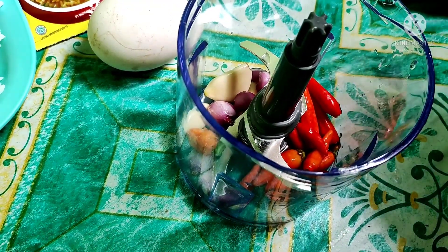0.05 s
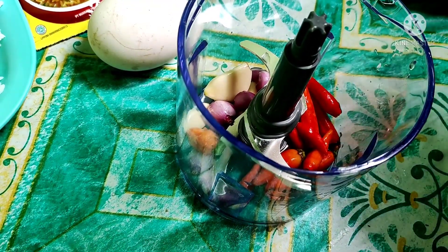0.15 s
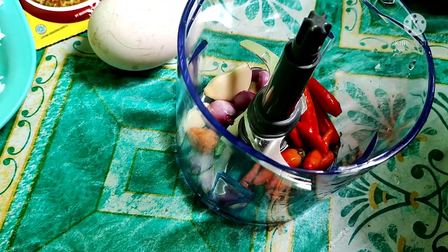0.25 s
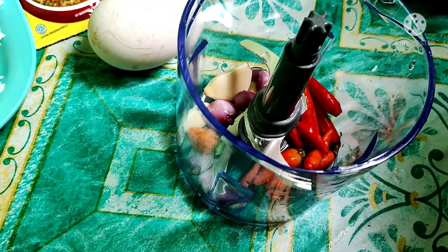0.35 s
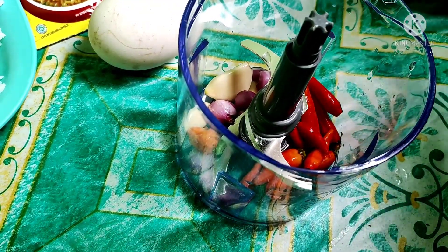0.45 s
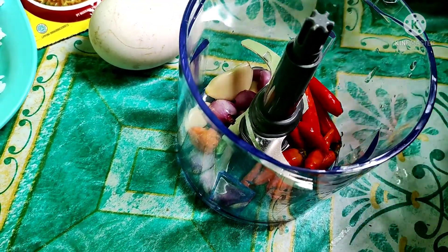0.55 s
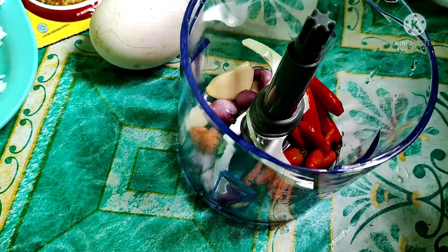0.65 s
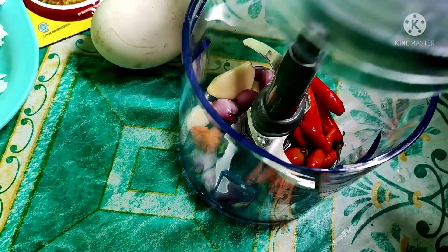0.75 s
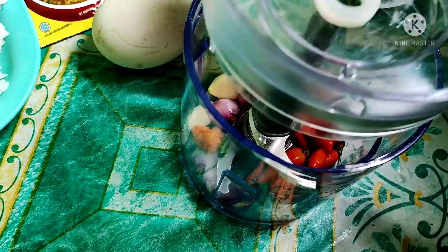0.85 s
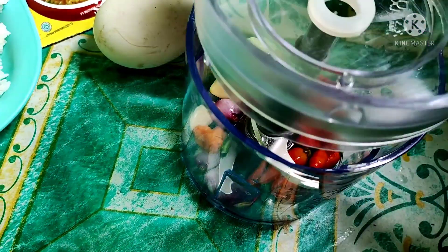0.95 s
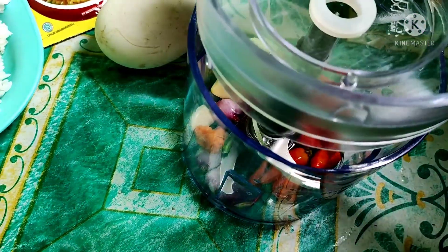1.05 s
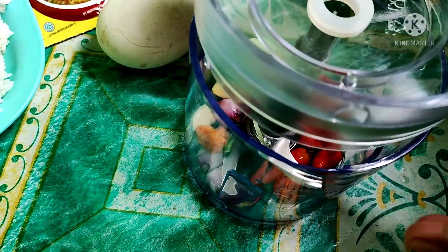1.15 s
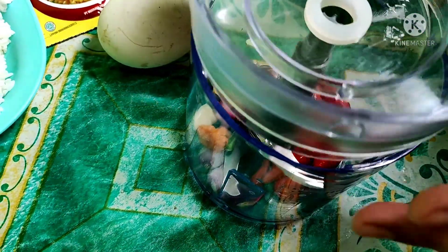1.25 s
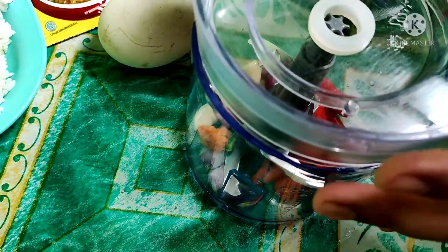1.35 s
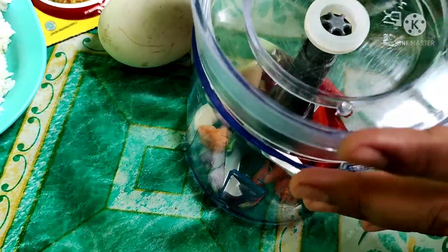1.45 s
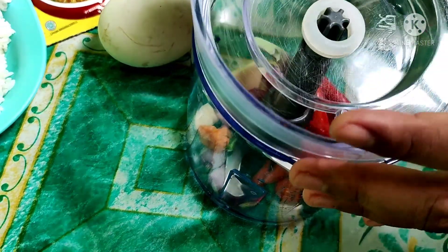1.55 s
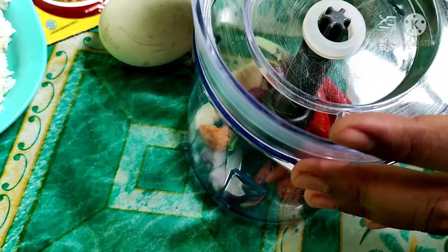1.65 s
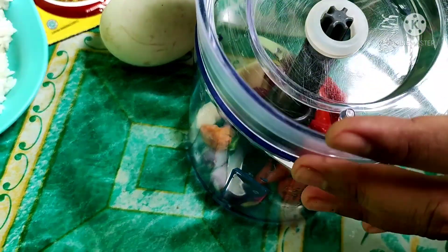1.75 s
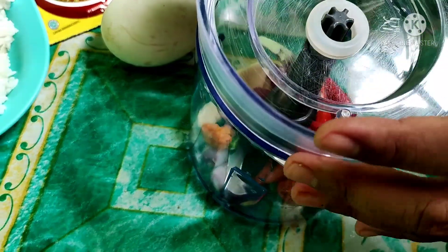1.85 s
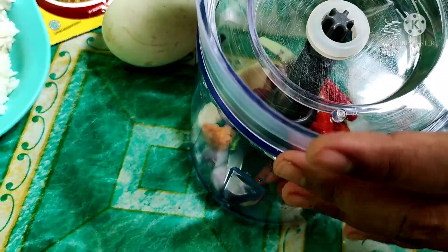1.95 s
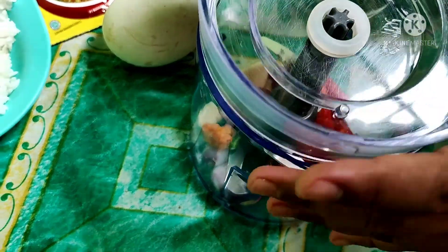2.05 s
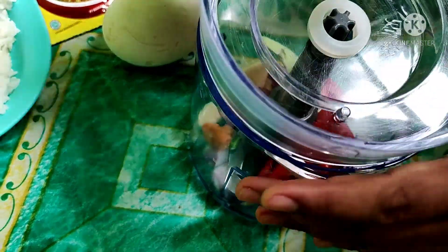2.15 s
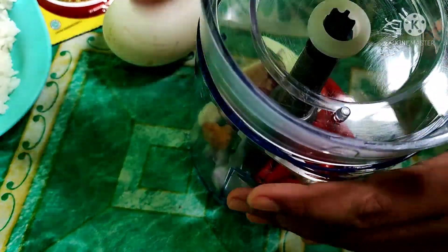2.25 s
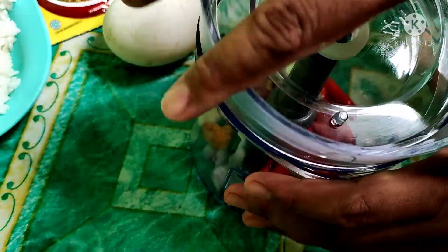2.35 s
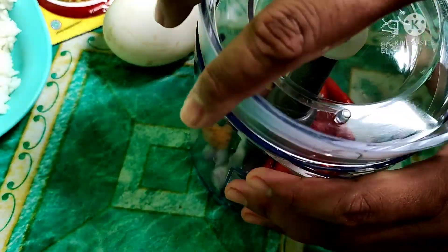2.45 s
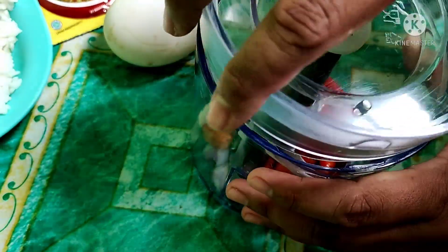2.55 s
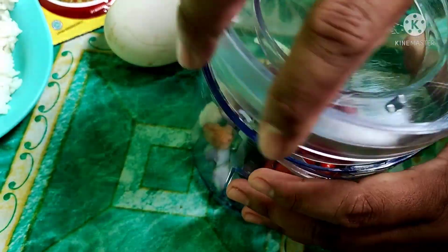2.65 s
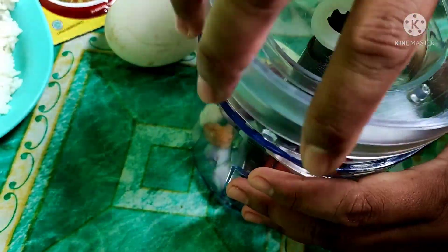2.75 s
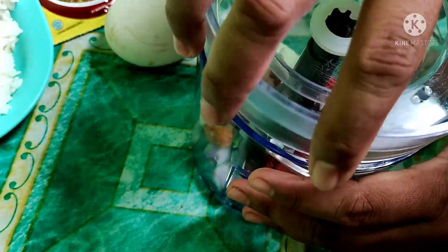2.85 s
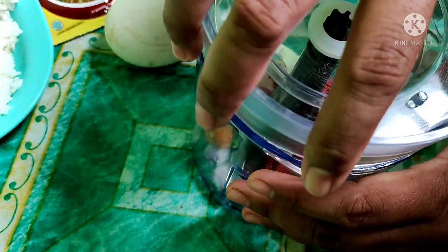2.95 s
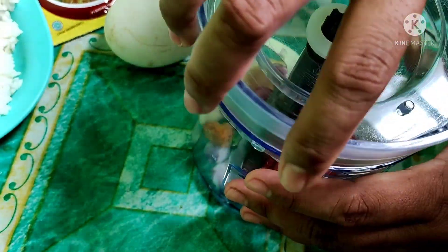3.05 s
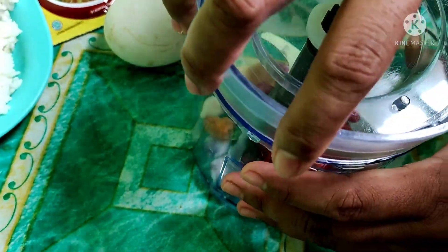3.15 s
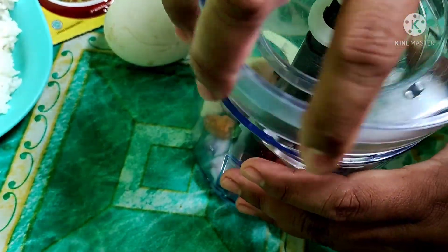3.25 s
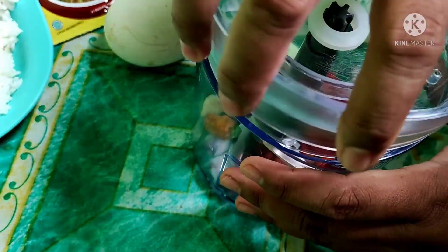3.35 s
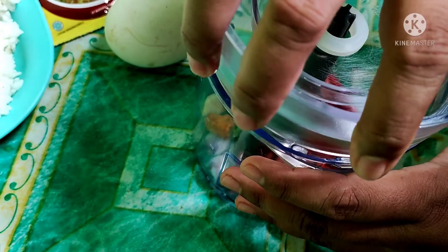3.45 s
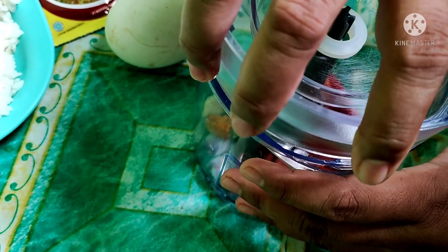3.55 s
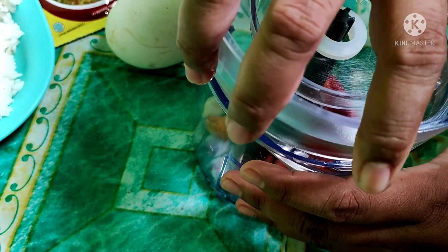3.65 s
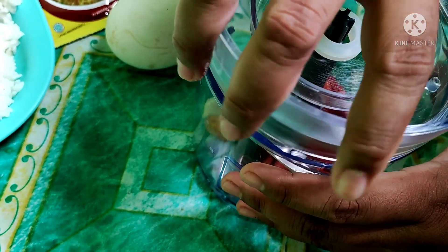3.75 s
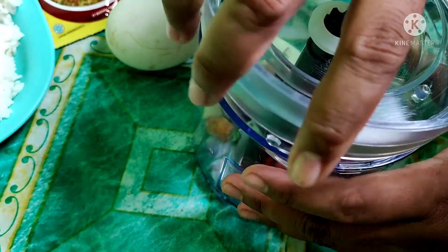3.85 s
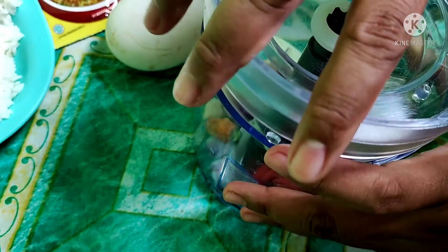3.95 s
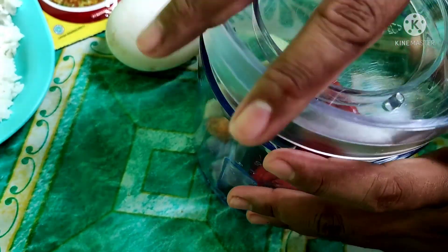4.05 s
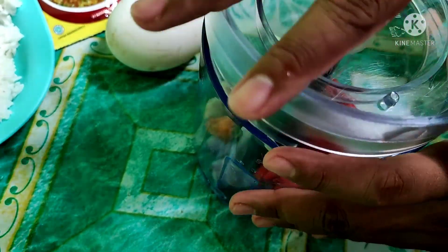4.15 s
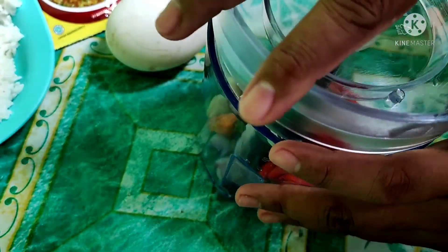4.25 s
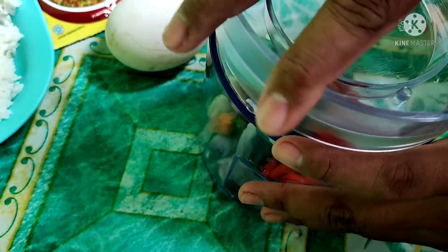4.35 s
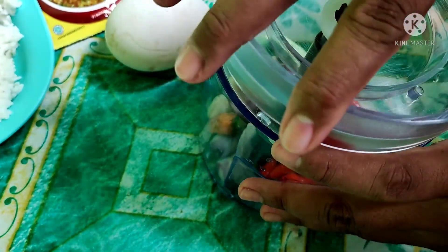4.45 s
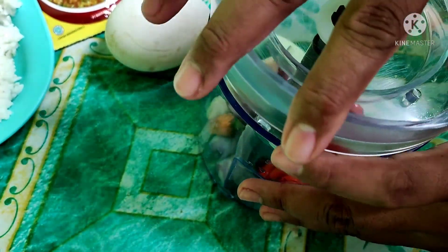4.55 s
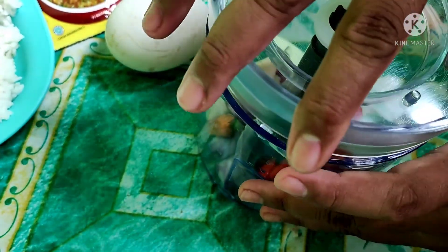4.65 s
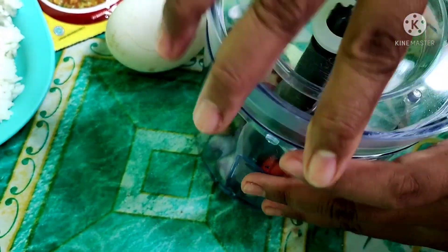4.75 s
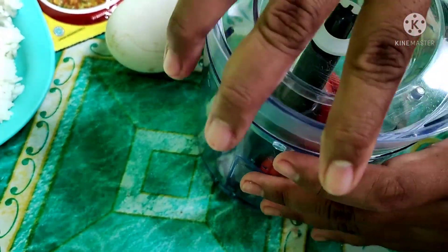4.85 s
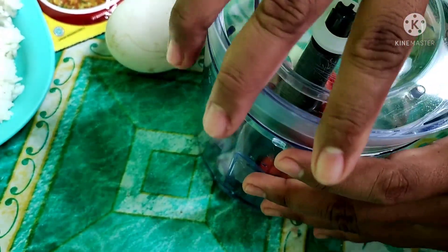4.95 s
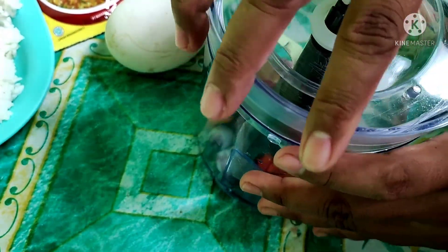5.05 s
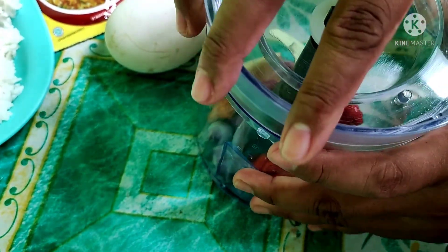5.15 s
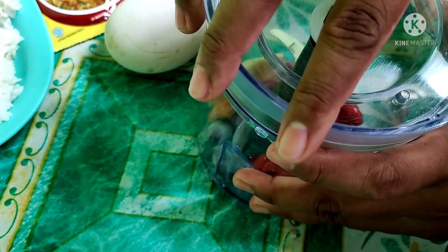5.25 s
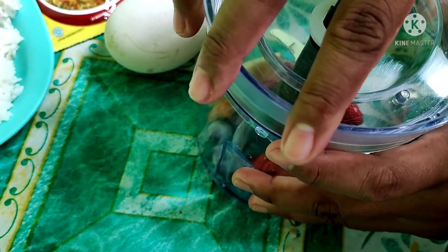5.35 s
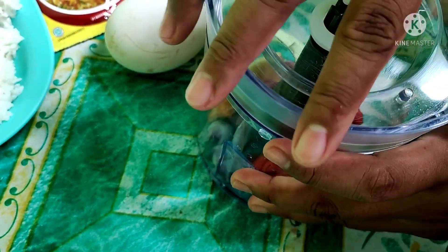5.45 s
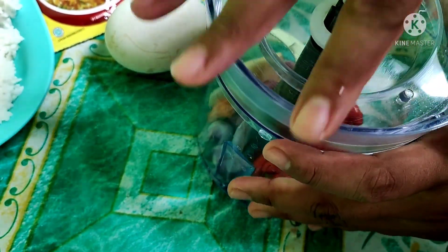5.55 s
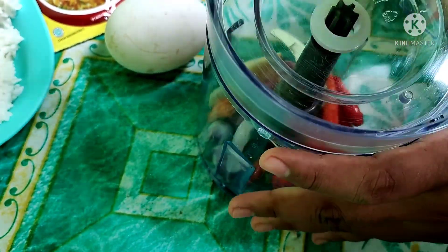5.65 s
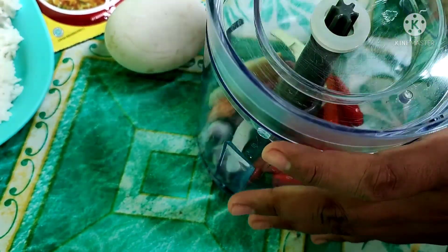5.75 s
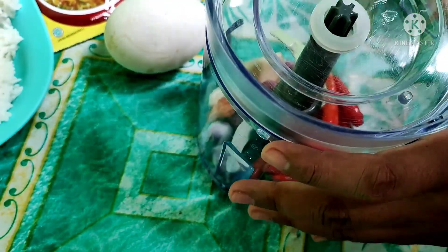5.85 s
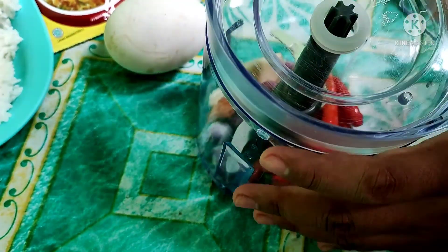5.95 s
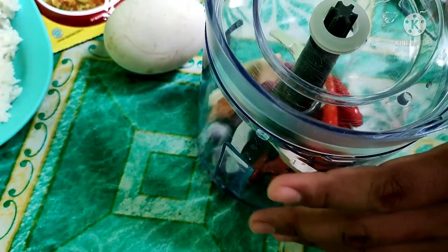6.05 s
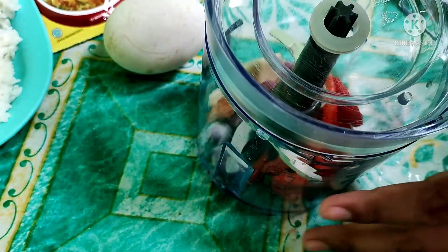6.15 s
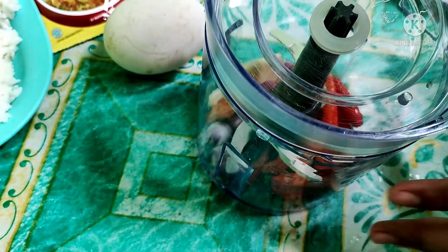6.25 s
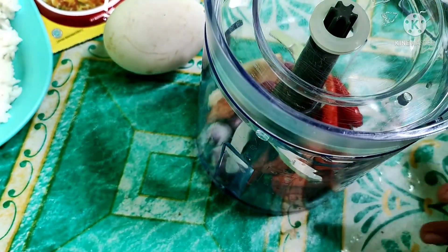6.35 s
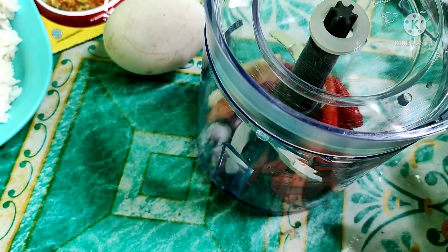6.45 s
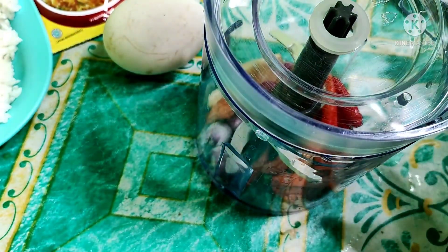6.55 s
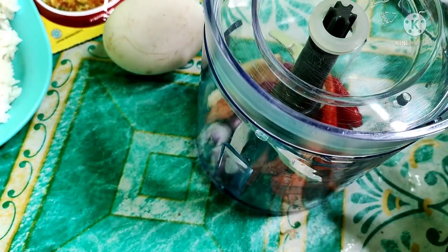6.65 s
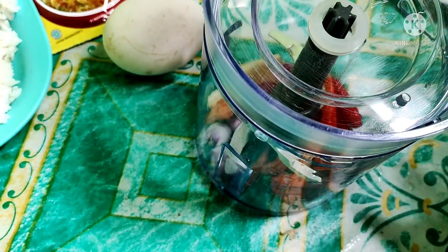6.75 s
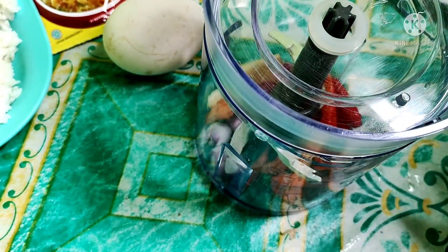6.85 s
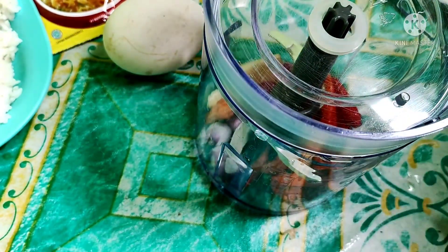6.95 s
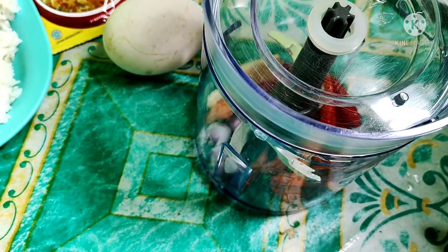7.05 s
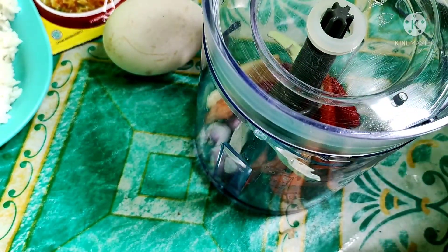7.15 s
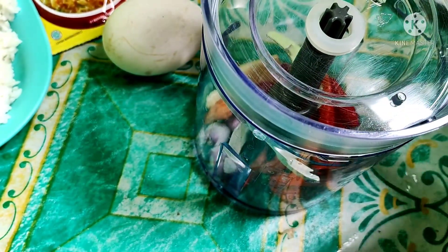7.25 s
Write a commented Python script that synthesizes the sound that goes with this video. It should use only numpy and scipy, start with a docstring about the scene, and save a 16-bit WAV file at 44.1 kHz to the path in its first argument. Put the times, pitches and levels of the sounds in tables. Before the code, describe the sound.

Close stereo view of a chopper bowl on a cloth-covered table. After near silence, the lid drops on with a hard bouncing plastic knock. Fumbling taps, creaky rubs and hollow clicks follow in uneven clusters, with two brighter snaps late on. The hands let go and only small ticks remain over quiet indoor rumble, hum and hiss.

```python
"""Lid clicked home on a small chopper

A plastic lid is set on the bowl of a small chopper, pressed, turned and clicked home in a quiet kitchen.
Each blow thumps the table, booms in the air shut in the bowl, rings the plastic and cracks: decaying sines
and noise bursts. Turning rubs the rim: dense clicks through the same modes. Filtered noise makes the
distant rumble, the wavering hum, a faint whistle that comes and goes and the faint hiss below."""
import sys
import numpy as np
from scipy import signal
from scipy.fft import rfft, irfft
from scipy.io import wavfile

SR = 44100
rng = np.random.default_rng(int(sys.argv[2]) if len(sys.argv) > 2 else 0)


def digitize_waveform(pressure):
    """Quantize a signal to 16-bit integers and store it at the path in sys.argv[1].

    Rows of a 2-D input are taken as channels; values are limited to [-1, 1].
    """
    field = np.atleast_2d(pressure).T
    bounded = np.clip(field, -1, 1)
    quanta = np.round(bounded * 32767).astype(np.int16)
    wavfile.write(sys.argv[1], SR, quanta)


N = 322194

# modes of the chopper; part rounds to 0 table, 1 bowl air, 2 lid plate, 3 wall, 4 thin rim
# columns: part, mode_hz, relative_level_db, t60_s, left_over_right_db, left_lead_ms
BODY = [(0, 45.5, 3.5, 0.1, 0, .01), (0, 85.2, -4.5, 0.22, 2, 0.011), (0, 101.8, 4.5, 0.19, -1.5, .01),
        (0, 183, -16.5, 0.35, -5.5, 0.012), (1.998, 650, -5.5, 0.11, -12.5, 0.018),
        (2, 902, -9, 0.081, 4.5, .05), (1.998, 1031, 4, 0.021, -4.5, 0.12), (2, 1185, -2, 0.039, 5, 0.056),
        (2, 1310, 1, 0.04, -3, 0.071), (2, 1557, -0.5, 0.033, 6.5, 0.16),
        (2.002, 1750, -1, 0.061, -11, .08), (2.999, 1990, -6, 0.12, -6.5, 0.045),
        (3, 2219, 4, 0.077, 0.5, 0.025), (3.001, 2318, 2.5, 0.084, -5.5, 0.054),
        (3.002, 2422, -5.5, 0.084, -3.5, 0.082), (3, 2520, 0.5, 0.05, -22, 0.043),
        (3, 3010, -5.5, 0.089, -0.5, .05), (3, 2935, -3.5, 0.099, -1, 0.099),
        (3, 3657, -6, 0.088, -19, 0.039), (4, 4253, -7, 0.033, -8.5, 0.023),
        (4, 5055, -7.5, 0.12, -5.5, 0.077), (3.999, 5454, -11, 0.08, -9.5, 0.054),
        (4, 6170, -19, 0.076, 12, 0.055), (3.998, 7197, -3.5, 0.064, -11, 0.072),
        (3.998, 7650, -5, 0.099, -9, 0.046)]


def from_db(db):
    """Amplitude gain of a level in dB."""
    return 10 ** (np.asarray(db) / 20)


def rms_one(x):
    """Scale to rms 1 over all channels."""
    return x / np.sqrt(np.mean(x ** 2) + 1e-20)


def in_time(rows):
    """Linear curve through (s, value) rows, one value a sample."""
    return np.interp(np.arange(N) / SR, *np.transpose(rows))


def at_hz(points, hz):
    """Value of a (Hz, value) curve, linear over log frequency."""
    table_hz, values = np.array(points).T
    return np.interp(np.log(hz), np.log(table_hz), values)


def resonance(x, hz, width_hz):
    """Two-pole resonator with a peak gain near 1."""
    r = np.exp(-np.pi * width_hz / SR)
    zeros = [(1 - r * r) / 2, 0, (r * r - 1) / 2]
    poles = [1, -2 * r * np.cos(2 * np.pi * hz / SR), r * r]
    return signal.lfilter(zeros, poles, x)


def bands(size):
    """Half-octave bands of stereo noise with their centres; mid and side weights set the left-right likeness."""
    # columns: hz, left_right_likeness (clipped to 0..1 below)
    likeness = [(60, 0.9), (180, 0.77), (550, 0.56), (1650, -0.71), (4970, 0.0016), (15000, -1.7)]
    edges_hz = 60 * 2 ** np.arange(0, 8.1, .5)
    white = rng.standard_normal((2, 2, size))  # neighbouring bands take different noise
    for k, (low_hz, high_hz) in enumerate(zip(edges_hz, edges_hz[1:])):
        band_pass = signal.butter(2, [low_hz, high_hz], "band", fs=SR, output="sos")
        mid, side = signal.sosfilt(band_pass, white[k % 2])
        centre_hz = np.sqrt(low_hz * high_hz)
        alike = np.clip(at_hz(likeness, centre_hz), 0, 1)
        yield centre_hz, np.sqrt(1 + alike) * mid + np.sqrt(1 - alike) * side * [[1], [-1]]


def decay(t, t60_s):
    """Exponential fall of 60 dB in t60_s, at least 4 ms."""
    return from_db(-60 * t / max(t60_s, .004))


def swell(t, hz):
    """Soft contact: a mode needs part of a cycle to build up."""
    swell_cycles = 0.63
    return 1 - np.exp(-t * hz / swell_cycles)


def burst(grit_spectrum, colour_gain, t, t60_s):
    """Grainy noise, coloured, that swells and dies away."""
    noise = rms_one(irfft(grit_spectrum * colour_gain, len(t)))
    return noise * decay(t, t60_s) * swell(t, 1600)


def stroke_db(s, hold_s, rise_db_per_s, fall_db_per_s):
    """Level that rises to 0 dB at s, holds, then falls."""
    t = np.arange(N) / SR
    rise_db = rise_db_per_s * (t - s)
    fall_db = fall_db_per_s * (s + hold_s - t)
    return np.minimum(0, np.minimum(rise_db, fall_db))


def background():
    """Noise through resonators makes rumble, hum and whistle; noise bands make steady hiss."""
    # distant rumble: time_s, level_db
    rumble_level = [(0.0, -51.5), (0.2, -64), (0.45, -54.5), (0.85, -61), (1.04, -49), (1.35, -59.5),
                    (1.9, -56.5), (2.9, -51), (3.3, -75), (3.9, -63), (4.8, -59), (5.11, -58.5),
                    (5.35, -72), (5.5, -47), (5.7, -59.5), (6.43, -60), (6.74, -53), (7.31, -53.5)]
    # low room modes: hz, width_hz, relative_level_db
    rumble_peaks = [(35.8, 17, -2.5), (79.4, 10, 11), (110.6, 7.9, 17.5), (123, 8.6, -3.5),
                    (165, 18, -23.5)]
    # wavering hum, narrow noise: hz, width_hz, level_db
    hum_peaks = [(242, 3.1, -59), (291, 4, -66.5), (578, 14, -73), (3080, 20, -81.5), (4300, 12, -91.5)]
    # faint whistle: full_level_s, hold_s, hz, level_db
    whistles = [(5.282, 0.11, 4750, -80), (5.636, .22, 4930, -71), (6.8, 0.24, 4980, -81)]
    # hiss colour: hz, relative_db_per_hz
    hiss_colour = [(88, -36), (150, -5), (189, -13), (243, -2.5), (393, -13.5), (578, -12), (991, -43.5),
                   (1270, -18.5), (1510, -25.5), (3090, -23), (3670, -30.5), (13600, -36.5), (15000, -57)]
    hiss_db = -64
    whistle_width_hz, whistle_fade_db_per_s = 60, 49.5

    white = rng.standard_normal(N)
    rumble = sum(from_db(level_db) * rms_one(resonance(white, hz, width_hz))
                 for hz, width_hz, level_db in rumble_peaks)
    tones = 0
    for hz, width_hz, level_db in hum_peaks:
        narrow = resonance(resonance(white, hz, width_hz), hz, width_hz)
        tones = tones + from_db(level_db) * rms_one(narrow)
    for s, hold_s, hz, level_db in whistles:
        whistle = resonance(resonance(white, hz, whistle_width_hz), hz, whistle_width_hz)
        fade_db = stroke_db(s, hold_s, whistle_fade_db_per_s, whistle_fade_db_per_s)
        tones = tones + from_db(level_db + fade_db) * rms_one(whistle)
    hiss = sum(from_db(at_hz(hiss_colour, hz)) * band for hz, band in bands(N) if hz > 140)
    return from_db(in_time(rumble_level)) * rms_one(rumble) + tones + from_db(hiss_db) * rms_one(hiss)


def blows():
    """Each blow rings all modes, each a little harder or softer, cracks and leaves loose parts clattering."""
    # blows and the level of each part: start_s, bowl_air_pitch_hz, table_db, bowl_air_db,
    # lid_plate_db, wall_db, crack_db, wall_pitch_hz
    blow_table = [(0.947, 236, -22.5, -28, -41, -43.5, -56.5, 2190),
                  (1.373, 490, -39, -30.5, -36, -37.5, -40, 2275),
                  (1.383, 556, -34, -9.5, -10, -22, -31.5, 2154),
                  (1.388, 575, -32.5, -39, -22.5, -19.5, -25, 2505),
                  (1.401, 461, -45.5, -18.5, -31.5, -25, -42.5, 2540),
                  (1.427, 510, -37, -21.5, -54, -48, -45, 2540),
                  (1.457, 532, -55, -31.5, -50, -53, -60, 2540),
                  (1.483, 500, -51, -31, -55, -58, -65, 2540), (1.503, 520, -50, -37, -55, -59, -60, 2540),
                  (1.554, 445, -26.5, -17.5, -22.5, -26, -26.5, 2260),
                  (1.573, 406, -34, -25.5, -36, -33.5, -30.5, 2360),
                  (1.586, 447, -35, -30, -51, -51, -52, 2350), (1.615, 414, -36, -31, -47, -56, -49, 2350),
                  (1.669, 381.6, -44, -25, -34.5, -65, -57, 2260),
                  (1.925, 389, -53, -50, -60, -56, -64, 2305),
                  (2.196, 436, -34.5, -34, -49, -51.5, -53, 2210),
                  (2.426, 404, -29.5, -15.5, -19, -29, -37, 2350),
                  (2.45, 400, -41, -17.5, -24, -43, -43.5, 2250),
                  (2.521, 390, -52, -30.5, -57, -50, -49, 2340),
                  (2.538, 390, -57, -24, -34.5, -41.5, -53, 2300),
                  (2.573, 410, -58, -34.5, -53, -53, -57, 2340),
                  (2.701, 256, -75, -38, -67.5, -71, -50, 2200),
                  (2.715, 420, -58, -29, -41, -68, -56, 1980), (2.73, 371, -30, -15, -28, -39, -34, 2320),
                  (2.744, 346, -42, -24, -28.5, -53, -29.5, 2240),
                  (2.756, 384, -26, -14.5, -15.5, -23, -28, 2520),
                  (2.799, 380, -37, -21, -37, -57, -56, 2480),
                  (2.839, 445, -47, -29.5, -51, -60, -53, 2370),
                  (2.909, 357, -46, -36.5, -47.5, -49.5, -50.5, 2350),
                  (3.014, 302, -62, -46, -69, -92, -91, 2190), (3.05, 360, -45, -43, -66, -68, -63, 2240),
                  (3.081, 333, -45, -21.5, -32.5, -73, -57, 2310),
                  (3.313, 386, -37, -38.5, -44.5, -53, -53, 2330),
                  (3.347, 338, -36, -27, -41.5, -62, -40.5, 2240),
                  (3.397, 315, -48, -30.5, -32, -39, -40, 2520),
                  (3.408, 337, -39, -25.5, -39, -59, -40.5, 2310),
                  (3.503, 269, -50, -25.5, -42.5, -57, -63, 2560),
                  (3.546, 260, -46, -23.5, -34, -45, -50, 2410),
                  (3.603, 282, -57, -40.5, -68, -75, -75, 2350),
                  (3.712, 243, -65, -44, -70, -67, -72, 2100),
                  (3.748, 260, -54, -31, -45, -51.5, -58, 2460),
                  (3.835, 253, -54, -40.5, -66, -64, -70, 2580),
                  (3.959, 382, -50, -37, -51, -63, -59.5, 2320),
                  (4.081, 289, -49, -29.5, -42.5, -44, -41, 2380),
                  (4.092, 527, -28, -32, -33.5, -31.5, -30, 2270),
                  (4.108, 518, -41, -26.5, -32.5, -39.5, -35, 2600),
                  (4.169, 264, -32, -24, -37, -56, -53, 2320),
                  (4.245, 399, -47, -24.5, -32.5, -51.5, -54, 2310),
                  (4.257, 333, -35.5, -29, -35, -40, -46, 2200),
                  (4.269, 279, -33, -25, -35, -51.5, -43, 2190),
                  (4.435, 244, -55, -45, -63, -52, -60.5, 2294),
                  (4.54, 291, -50.5, -38.5, -45, -64, -56, 2210),
                  (4.569, 278, -32.5, -24.5, -41, -46, -49, 2387),
                  (4.651, 387, -34, -26.5, -34, -42, -44, 2293),
                  (4.674, 285, -44, -33, -46, -62, -58.5, 2330),
                  (4.819, 419, -33, -29, -36.5, -38, -36.5, 2320),
                  (4.843, 333, -46.5, -18, -11.5, -12, -29, 2265),
                  (4.856, 313, -35.5, -30.5, -42.5, -29, -38.5, 2470),
                  (4.937, 308, -29, -35, -29, -26.5, -46, 2490),
                  (5.155, 293, -55, -42, -66, -51.5, -64, 2120),
                  (5.262, 283, -41, -35, -42.5, -69, -71, 2220),
                  (5.292, 260, -41, -30.5, -42.5, -54, -62, 2300),
                  (5.324, 268, -57, -41, -82, -74.5, -73, 2250),
                  (5.439, 326, -31.5, -35.5, -37.5, -44.5, -52, 2280),
                  (5.458, 263, -55, -30.5, -35, -40.5, -47.5, 2390),
                  (5.597, 289, -50, -45, -45, -58, -63, 2400),
                  (5.675, 358, -49, -22, -20.5, -21, -29.5, 2270),
                  (5.693, 306, -36, -19.5, -22, -25, -39.5, 2250),
                  (5.97, 354, -47, -34, -48, -64, -63.5, 2530),
                  (6.029, 321, -46, -32.5, -34, -40, -56.5, 2200),
                  (6.294, 330, -57, -46, -56.5, -72.5, -50, 2380),
                  (6.344, 246, -44, -46, -45, -51, -53.5, 2280),
                  (6.689, 239, -64.5, -56, -49, -60, -48, 2500),
                  (6.729, 242, -37, -67, -53.5, -67, -57, 2510),
                  (7.135, 242, -48, -61, -56, -49, -66, 2380)]
    # air in the bowl and its wall partners: pitch_multiple, relative_level_db, t60_s
    bowl_air = [(.68, -15, 0.17), (0.862, -14.5, 0.15), (1.013, 5, 0.08), (1.18, 8, 0.013),
                (1.421, -1.5, 0.014)]
    # crack colour: hz, relative_db_per_hz
    crack_colour = [(1470, -22), (2500, 0), (2780, -8.5), (3350, -9), (4870, -12.5), (5330, -7.5),
                    (7190, -10), (13200, -20.5), (15000, -32.5)]
    # colour of loose parts shaking: hz, relative_db_per_hz
    clatter_colour = [(300, -26.5), (600, 10.5), (1200, 2.5), (2300, 3.5), (3600, -13.5), (5000, -35.5)]
    # the hand shortens every ring: time_s, damping_factor
    grip = [(0, 1.6), (1.4, 1.7), (2.4, 1.23), (3.0, 1.52), (3.6, 1.6), (4.1, 1.4), (4.8, 1.8), (5.7, 1.3),
            (7.3, 1.3)]
    grip_per_db = 0.0065  # a light touch, where the fingers stay on, damps more
    crack_db, crack_t60_s = 3, 0.14  # t60s are before the grip
    clatter_db, clatter_t60_s = -8.5, 0.17
    scatter_db, detune = 2.5, .006  # standard deviations; detune is a fraction of the pitch
    plate_favours_hz, plate_loss_db_per_octave = 1060, 11.5
    wall_loss_db_per_octave, wall_loss_most_db = 43.5, 15

    out = np.zeros((2, N + SR))
    t = np.arange(8192) / SR
    hz = np.maximum(np.fft.rfftfreq(len(t), 1 / SR), 1)
    crack_gain = from_db(at_hz(crack_colour, hz))
    clatter_gain = from_db(at_hz(clatter_colour, hz))
    luck = rng.standard_normal((len(blow_table), 2, len(BODY) + len(bowl_air)))
    for (s, pitch_hz, *parts_db, wall_hz), (harder, detuned) in zip(blow_table, luck):
        damping = np.interp(s, *np.transpose(grip)) - grip_per_db * max(parts_db)
        modes = BODY + [(1, k * pitch_hz, level_db, t60_s, -.4, .02) for k, level_db, t60_s in bowl_air]

        # noise whose level jumps every 32 samples
        grain_gain = from_db(3 * rng.standard_normal(256)).repeat(32)
        grit = rfft(rng.standard_normal((2, len(t))) * grain_gain)
        crack = burst(grit, crack_gain, t, crack_t60_s / damping)
        sound = from_db(parts_db[4] + crack_db) * crack
        clatter = burst(grit[0] + grit / 2, clatter_gain, t, clatter_t60_s / damping)
        sound += from_db(max(parts_db[2:4]) + clatter_db) * clatter

        for k, (part, mode_hz, level_db, t60_s, pan_db, lead_ms) in enumerate(modes):
            part = round(part)
            level_db = level_db + parts_db[part] + scatter_db * harder[k]
            # where the blow lands decides which modes sing
            if part == 2:
                level_db -= plate_loss_db_per_octave * abs(np.log2(mode_hz / plate_favours_hz))
            if part == 3:
                loss_db = wall_loss_db_per_octave * abs(np.log2(mode_hz / wall_hz))
                level_db -= min(loss_db, wall_loss_most_db)
            n = min(len(t), int(t60_s / damping * SR * 2 / 3))  # stop 40 dB down
            turn = 2 * np.pi * mode_hz * (1 + detune * detuned[k])
            phase = turn * (t[:n] + np.array([[lead_ms], [0]]) / 1000)
            sign = 1 if part == 1 else (-1) ** k
            sides = sign * from_db([[level_db + pan_db / 2], [level_db - pan_db / 2]])
            envelope = decay(t[:n], t60_s / damping) * swell(t[:n], mode_hz)
            sound[:, :n] += sides * envelope * np.sin(phase)
        at = round(s * SR)
        out[:, at:at + len(t)] += sound
    return out[:, :N]


def rubbing():
    """The rim slips in dense tiny clicks that sound the plate, wall and rim modes."""
    # strokes of the lid on the rim: full_level_s, rise_db_per_s, hold_s, dull_db, wall_db, rim_db
    strokes = [(1.033, 160, 0.053, -69, -69, -83), (2.17, 159, 0.012, -56.5, -61.5, -68.5),
               (2.709, 900, 0.098, -43, -53, -53), (2.933, 173, 0.05, -70, -75, -66.5),
               (3.06, 200, 0.034, -58.5, -63, -65.5), (3.307, 1499, 0.17, -52, -60, -63.5),
               (3.884, 146, 0.044, -60.5, -62, -65.5), (4.16, 156, 0.035, -49, -63.5, -66),
               (4.435, 600, 0.058, -56.5, -57.5, -62.5), (4.62, 162, .04, -61.5, -72, -68),
               (4.88, 903, .11, -40, -40, -73), (5.24, 157.5, 0.038, -76, -67, -75),
               (5.665, 182, 0.05, -45.5, -57, -65), (5.72, 894, .03, -58, -53.5, -65),
               (6.329, 200, 0.047, -56.5, -56.5, -71), (6.503, 160, 0.48, -85, -65.5, -82),
               (7.15, 103, .16, -64.5, -58, -69.5)]
    # how well rubbing sounds each part, in part order: gain_db
    rub_part_db = [0, 0, -14.5, 1.5, -11.5]
    slips_per_s, slip_spread_db = 600, -0.5  # rate of each of the two click trains
    fall_db_per_s = 131.5

    trains = (rng.random((2, N)) < slips_per_s / SR) * rng.choice([-1, 1], (2, N))
    trains = trains * from_db(slip_spread_db * np.minimum(rng.exponential(1, (2, N)), 4))
    mid, side = trains
    slips = mid + 1.1 * side * [[1], [-1]] + 1e-18
    left = slips[0]  # the dull part is the same on both sides
    dull = resonance(left, 390, 150) + 0.45 * resonance(left, 440, 110)
    wall, rim = 0, 0
    for part, hz, level_db, t60_s, *_ in BODY:
        part = round(part)
        gain = from_db(level_db + rub_part_db[part])
        if part == 2:
            dull = dull + gain * resonance(left, hz, 0.96 / t60_s)
        if part == 3:
            wall = wall + gain * resonance(slips, hz, 6.0 / t60_s)
        if part == 4:
            rim = rim + gain * resonance(slips, hz, 6.8 / t60_s)
    rim = rms_one(rim) + 0.53 * rms_one(resonance(slips, 8000, 7000))

    levels_db = np.full((3, N), -200.)
    for s, rise_db_per_s, hold_s, *stroke_levels_db in strokes:
        shape_db = stroke_db(s, hold_s, rise_db_per_s, fall_db_per_s)
        levels_db = np.maximum(levels_db, np.add.outer(stroke_levels_db, shape_db))
    dull_gain, wall_gain, rim_gain = from_db(levels_db)
    return dull_gain * rms_one(dull) + wall_gain * rms_one(wall) + rim_gain * rms_one(rim)


def kitchen(x):
    """Dense reflections: convolution with noise that dies band by band."""
    # columns: hz, t60_s
    room_t60 = [(100, 0.33), (400, 0.38), (2000, 0.5), (6000, 0.38), (14000, .3)]
    # columns: hz, relative_level_db
    room_colour = [(100, -14), (400, -12.5), (2000, -13.5), (6000, -11), (14000, -10.5)]
    t = np.arange(int(.8 * SR)) / SR
    tail = 0
    for hz, band in bands(len(t)):
        tail = tail + from_db(at_hz(room_colour, hz)) * band * decay(t, at_hz(room_t60, hz))
    tail = tail * np.minimum(t / 0.004, 1) / np.sqrt(0.017 * SR)  # 4 ms fade-in
    mono = x.mean(axis=0)[None]
    return signal.fftconvolve(mono, tail, axes=1)[:, :N]


def scene():
    """The chopper close by, in its kitchen."""
    chopper = blows() + rubbing()
    return chopper + kitchen(chopper) + background()


def record(dry):
    """The microphone loses the deepest bass and rounds the highest peaks; the top is cut."""
    cutoff_hz = 15200
    thin = signal.sosfilt(signal.butter(1, 25, "high", fs=SR, output="sos"), dry)
    top_cut = signal.cheby2(14, 55, cutoff_hz, fs=SR, output="sos")
    return signal.sosfilt(top_cut, np.tanh(thin))


dry = scene()
out = record(dry)
digitize_waveform(out)
```